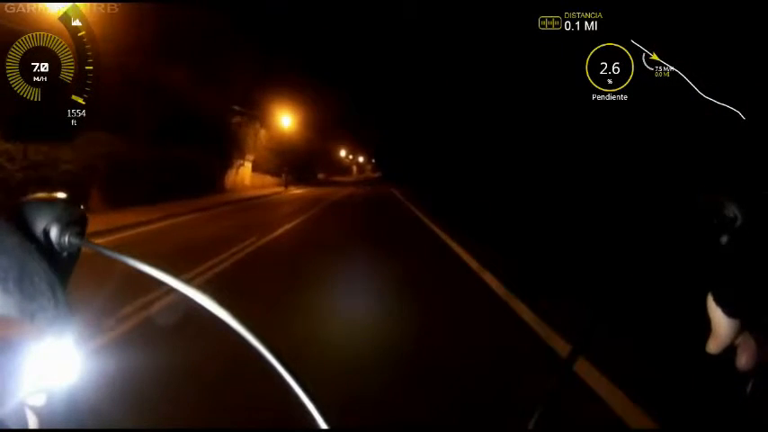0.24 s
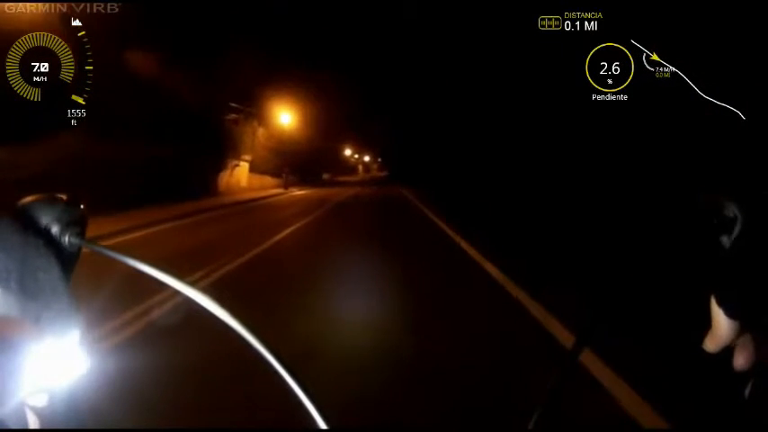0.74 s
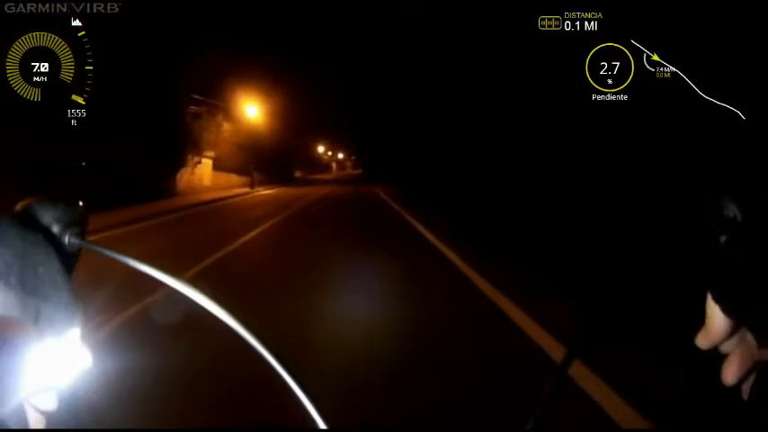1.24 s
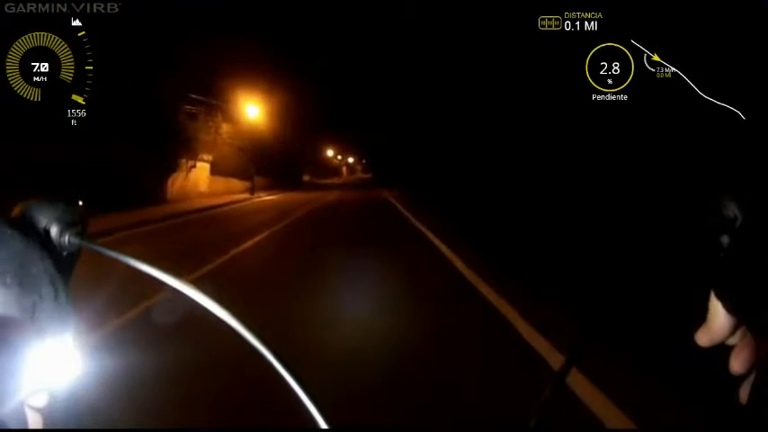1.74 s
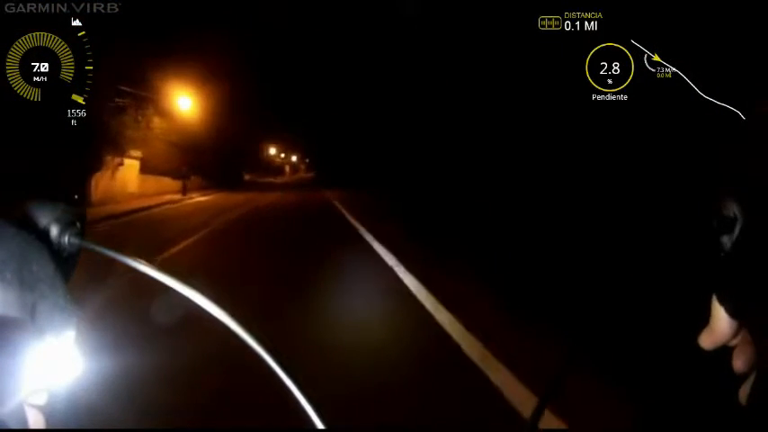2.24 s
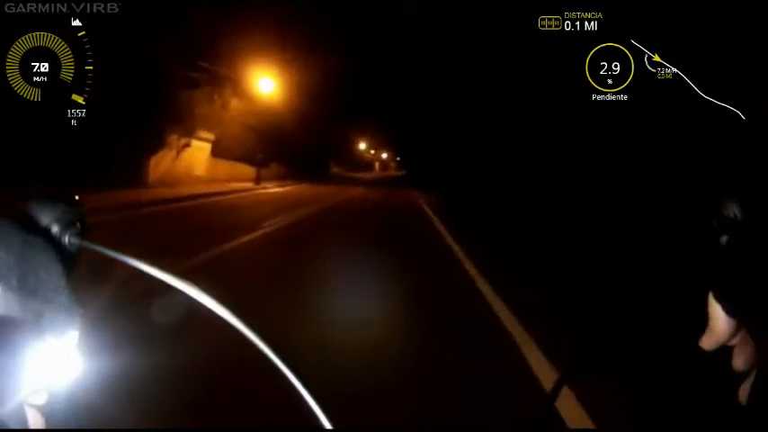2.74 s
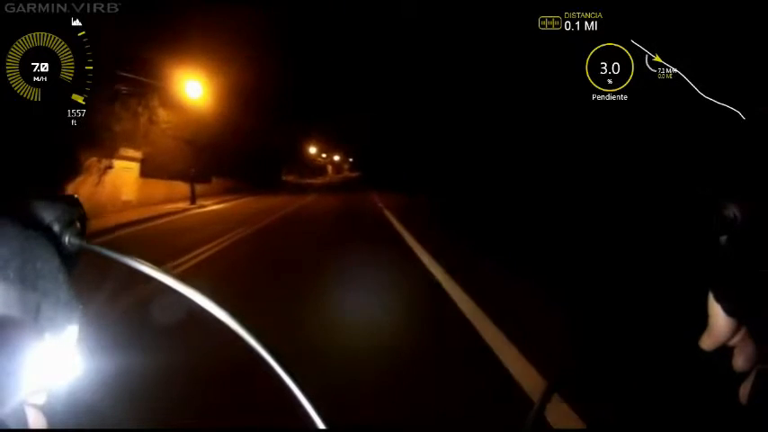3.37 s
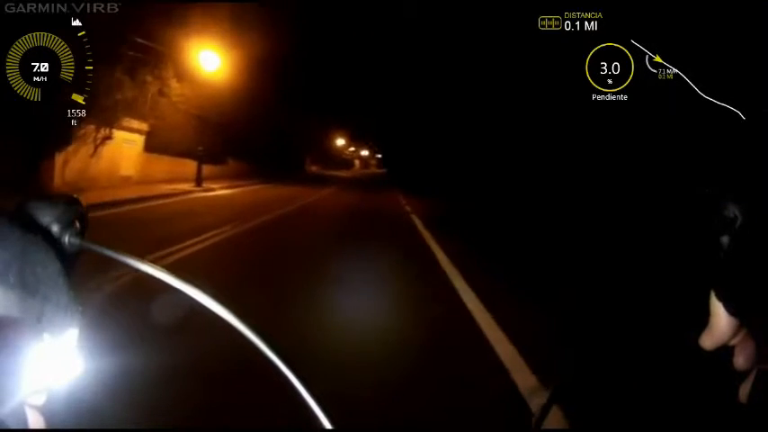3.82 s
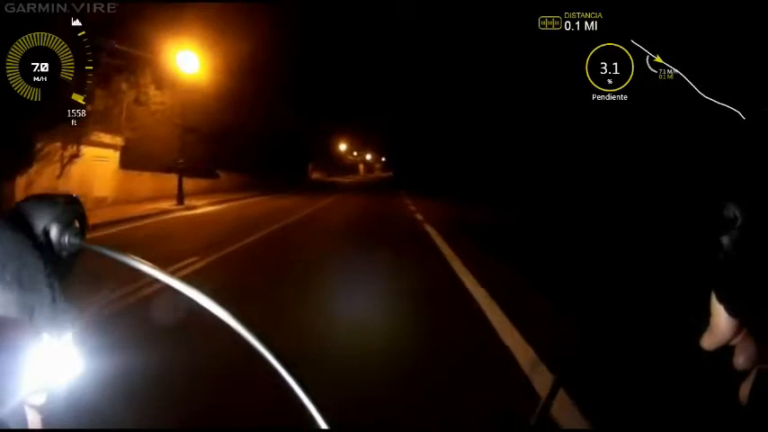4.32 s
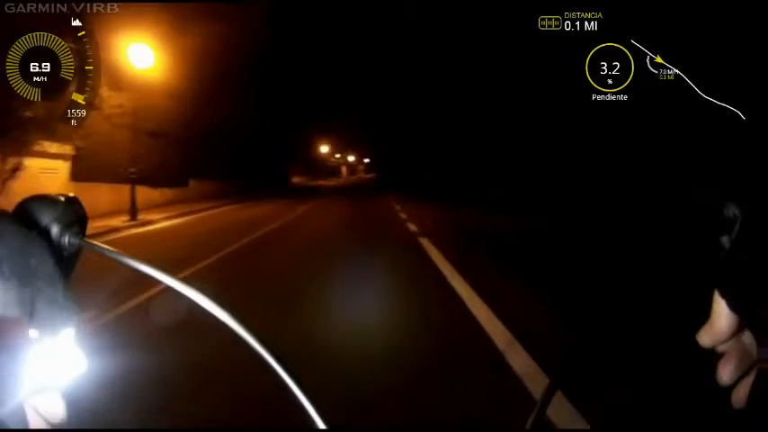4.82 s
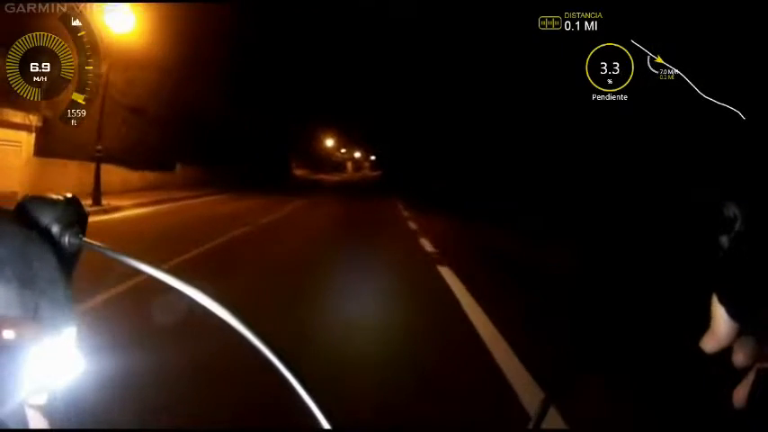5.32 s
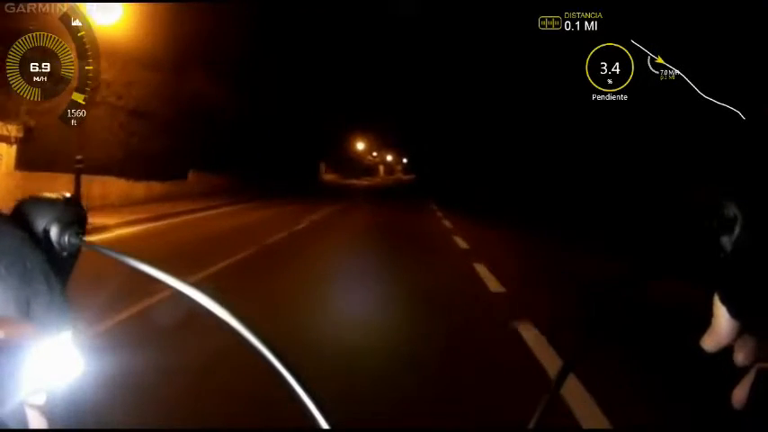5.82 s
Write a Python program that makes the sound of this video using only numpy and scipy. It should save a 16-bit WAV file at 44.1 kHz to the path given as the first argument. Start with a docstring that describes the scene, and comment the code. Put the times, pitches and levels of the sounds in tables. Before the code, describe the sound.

Close, enclosed handlebar sound of slow riding: the tyre's rough contact with asphalt becomes a constant boxy mid-low drumming, dull on top. Small thuds, tiny random taps and irregular knocks of a loose part punctuate it. Most knocks are weak and muffled; a handful are crisp short clicks or tight clusters. A low bar wobble swells slightly after two seconds, and very faint hiss lies underneath.

```python
"""A bicycle rolls slowly on asphalt, heard from inside a closed hollow case on the handlebar.
Road: random grain pushes and single stone thuds, filtered by tyre and case. Bar: low shaped noise, level varied.
Loose part: short runs of contacts, each a knock ringing the case plus a sharp noise tick.
Chain and cables: light random taps. Microphone: faint shaped hiss."""
import sys
import numpy as np
from scipy import signal
from scipy.fft import rfft, irfft
from scipy.io import wavfile

SR = 44100
rng = np.random.default_rng(int(sys.argv[2]) if len(sys.argv) > 2 else 0)


def bounce(signal):
    """Save signal as a 16-bit WAV file at the path given by the first command-line argument."""
    frames = np.transpose(np.atleast_2d(signal))
    limited = np.clip(frames, -1, 1)
    pcm = np.round(limited * 32767).astype(np.int16)
    wavfile.write(sys.argv[1], SR, pcm)


N = 268569
TIME_S, FREQ_HZ = np.arange(N) / SR, np.fft.rfftfreq(2 * N, 1 / SR)

# resonances of the case: f/Hz, width/Hz, relative level/dB
CASE_MODES = [(255.7, 40, -12), (289, 22, -9.5), (354, 25, -3.5), (404.5, 52, 1.5), (474, 85, -3),
              (520.4, 24.4, -2.5), (580.5, 24, 0.5), (654.5, 78.4, 1.5), (684, 39, 3.5), (809.6, 48.5, -3),
              (897, 46, -6), (1022, 108, -14), (1160, 70, -39), (1331, 52, -14), (1475, 80, -21.5),
              (1655, 91, -19), (1754, 81, -21.5), (1952, 74, -26.5), (2290, 160, -35), (2950, 260, -37.5),
              (3700, 910, -54.5)]
# force passed on from the asphalt by the soft tyre: f/Hz, relative level/dB
TYRE_FORCE = [(30, -11), (150, -4.5), (250, 0), (400, 6), (650, -2), (800, -10.5), (1000, -14.5),
              (1330, -10.5), (1600, -39.5), (2200, -26), (3200, -27), (6000, -41), (16000, -62)]
# coarse stones under the tyre: t/s, peak level before trim/dB
STONE_THUDS = [(0.582, -26.5), (0.697, -20), (1.36, -19), (1.859, -26), (1.944, -22), (2.214, -22),
               (3.624, -20.5)]
# spectrum of the bar's sway: f/Hz, relative level/dB
BAR_SWAY = [(5, -31), (20, -1), (36, -5.5), (45, -5.5), (54, 4.5), (66, -8), (95, -7), (170, -12.5),
            (300, -29.5), (900, -67)]
# microphone hiss spectrum: f/Hz, relative level/dB
HISS_SPECTRUM = [(100, -3), (1800, 9), (3000, 1.5), (4200, 0.5), (5300, -0.5), (9400, -3), (13400, -6.5),
                 (15600, -9.5)]
# runs of the loose part: t of strongest contact/s, contacts before, contacts after, gap/s,
# knock level before trim/dB, tick level before trim/dB
RATTLE_RUNS = [(0.1768, 2, 2, .0095, -53, -53.5), (0.673, 0, 0, .02, -75, -87),
               (0.942, 0, 0, .02, -68, -85), (1.083, 2, 1, .022, -54, -66),
               (1.324, 1, 1, .0195, -64.5, -87), (1.416, 1, 0, .027, -62, -87),
               (1.834, 0, 0, .02, -66, -86), (2.133, 0, 0, .02, -57.5, -76), (2.2654, 0, 0, .02, -68, -85),
               (2.47, 0, 0, .02, -64, -88), (2.557, 0, 1, .0196, -59, -82), (2.9, 0, 1, 0.016, -61, -87),
               (3.6632, 0, 2, .0174, -54.5, -64), (3.807, 0, 0, .02, -69, -77),
               (4.011, 0, 0, .02, -68, -80), (4.237, 2, 0, .021, -60.5, -82),
               (4.314, 2, 1, .018, -64.5, -87), (4.4, 0, 0, .02, -57, -78),
               (4.5728, 0, 1, 0.016, -56, -65.5), (4.819, 0, 0, .02, -69, -75), (4.9, 1, 1, .019, -59, -81),
               (5.058, 0, 0, .02, -59.5, -82), (5.117, 0, 2, 0.017, -64, -81), (5.208, 0, 0, .02, -72, -80),
               (5.66, 2, 1, .0203, -55.5, -66.5), (6.0545, 0, 0, .02, -62, -80)]
# contact force as it reaches the case: f/Hz, relative level/dB
CONTACT_FORCE = [(60, 5.5), (200, 10.5), (400, -2.5), (650, 0), (850, -2.5), (1100, -0.5), (1330, -3.5),
                 (1480, 0), (1650, 0), (2000, 4), (3000, 1)]
# colour of a hard contact: f/Hz, relative level/dB
TICK_COLOUR = [(300, -21), (2300, -17), (2900, 1.5), (3750, 4.5), (4100, -5.5), (4600, -12.5), (5800, -12),
               (7200, -23.5), (9800, -20.5), (12200, -16.5), (15500, -31)]

DRUM_DB, HISS_DB = -35.5, -72  # rms
# bar: steady quiver, uneven stretch, jolt around each run (slope in dB per dB of knock)
QUIVER_DB = -56.5
UNEVEN_FROM_S, UNEVEN_TO_S, UNEVEN_RISE_S, UNEVEN_FADE_S, UNEVEN_DB = 2.16, 2.52, 0.066, 0.18, -53
JOLT_DB, JOLT_KNOCK_DB, JOLT_SLOPE, JOLT_S = -51.5, -52.5, 1.5, 0.05
# within a run: level drop at RUN_S from the strongest contact
RUN_S, KNOCK_FADE_DB, TICK_FADE_DB = 0.021, 2, 7
# bands in which knock and tick levels are set
KNOCK_BAND_HZ, TICK_BAND_HZ = (1450, 2200), (2600, 4500)
EDGE_HZ = 15720


def gain_of(db):
    """Decibels to amplitude."""
    return 10 ** (np.asarray(db) / 20)


def evened(x):
    """Scale to rms one."""
    return x / np.sqrt(np.mean(x ** 2) + 1e-20)


def colour(points):
    """Gain over FREQ_HZ, interpolated in dB over log frequency."""
    hz, db = np.transpose(points)
    return gain_of(np.interp(np.log(FREQ_HZ + 1), np.log(hz), db))


def ringing(gain, size=4096):
    """Minimum-phase impulse response of a gain, peak gain one, by cepstrum folding."""
    cepstrum = irfft(np.log(np.maximum(gain / gain.max(), 1e-5)))
    cepstrum[1:N] *= 2
    cepstrum[N + 1:] = 0
    return irfft(np.exp(rfft(cepstrum)))[:size]


def noise(gain):
    """Steady Gaussian noise of rms one, shaped by a gain."""
    white = rng.standard_normal(2 * N)
    return evened(irfft(rfft(white) * gain)[:N])


def add(mix, start_s, sound):
    """Mix a sound in at a time."""
    part = mix[max(round(start_s * SR), 0):][:len(sound)]
    part += sound[:len(part)]


def at_level(hit, db, band_hz):
    """Scale a hit so its in-band energy equals 8 ms at this rms level."""
    bandpass = signal.butter(4, band_hz, "band", fs=SR, output="sos")
    inside = signal.sosfilt(bandpass, hit)
    return hit * gain_of(db) * np.sqrt(0.008 * SR / np.sum(inside ** 2))


def case_gain(wall_db=-22, wall_hz=750):
    """Case resonances, power-summed with the dull sound passing its walls."""
    power = (gain_of(wall_db) / (1 + (FREQ_HZ / wall_hz) ** 2)) ** 2
    for hz, width_hz, db in CASE_MODES:
        mode = gain_of(db) / (1 + np.sqrt(2) * ((FREQ_HZ - hz) / width_hz) ** 2)
        power = power + mode ** 2
    return np.sqrt(power)


def road(case, grains_per_s=7000, spread_db=1.23, stone_trim_db=-3):
    """Asphalt grains push the tyre at random and drum in the case; coarse stones thud singly."""
    push = ringing(case * colour(TYRE_FORCE))
    count = N + len(push) - 1  # lead-in, so the drumming starts at full level
    size_db = spread_db * np.minimum(rng.exponential(1, count), 4)
    sizes = rng.standard_normal(count) * gain_of(size_db)
    grains = sizes * (rng.random(count) < grains_per_s / SR)
    out = evened(signal.fftconvolve(grains, push, "valid")) * gain_of(DRUM_DB)
    thud = push / abs(push).max()
    for start_s, peak_db in STONE_THUDS:
        add(out, start_s, gain_of(peak_db + stone_trim_db) * thud)
    return out


def handlebar():
    """Bar and fork quiver at their low bending note, more on uneven asphalt and around each rattle run."""
    rise = np.clip((TIME_S - UNEVEN_FROM_S) / UNEVEN_RISE_S, 0, 1)
    uneven = rise * np.exp(-np.maximum(TIME_S - UNEVEN_TO_S, 0) / UNEVEN_FADE_S)
    jolts = np.zeros(N)
    for run_s, _, _, _, knock_db, _ in RATTLE_RUNS:
        jolt_db = JOLT_DB + JOLT_SLOPE * (knock_db - JOLT_KNOCK_DB)
        jolts += gain_of(jolt_db) * np.exp(-((TIME_S - run_s) / JOLT_S) ** 2)
    level = np.sqrt(gain_of(QUIVER_DB) ** 2 + (gain_of(UNEVEN_DB) * uneven) ** 2 + jolts ** 2)
    return noise(colour(BAR_SWAY)) * level


def hiss(echo=0.24, echo_s=0.000475):
    """Microphone noise, slightly hollow from a very short inverted echo."""
    comb = abs(1 - echo * np.exp(-2j * np.pi * FREQ_HZ * echo_s))
    return gain_of(HISS_DB) * noise(colour(HISS_SPECTRUM) * comb)


def scatter(spread_s, size=768):
    """Impulse smeared over a few ms by the frame: random phase, nearly flat spectrum."""
    swell = np.sin(np.pi * np.minimum(TIME_S[:size] / spread_s, 1))
    spectrum = rfft(rng.standard_normal(size) * swell)
    return irfft(spectrum / abs(spectrum)) * (swell > 1e-9)


def contacts():
    """All loose-part contacts (t/s, knock/dB, tick/dB), weaker away from each run's strongest."""
    rows = []
    for run_s, before, after, gap_s, knock_db, tick_db in RATTLE_RUNS:
        for offset_s in gap_s * np.arange(-round(before), round(after) + 1):
            away = (offset_s / RUN_S) ** 2
            rows.append((run_s + offset_s, knock_db - KNOCK_FADE_DB * away, tick_db - TICK_FADE_DB * away))
    return rows


def faint_ticks(case, ticks_per_s=150, spread_db=2.0, ticks_db=-69, busy_db=5, busy_s=0.032, spread_s=0.005):
    """Chain and cables tap lightly at random, harder near loose-part contacts."""
    nearness = sum(np.exp(-((TIME_S - contact_s) / busy_s) ** 2) for contact_s, _, _ in contacts())
    size_db = spread_db * np.minimum(rng.exponential(1, N), 3) + busy_db * np.tanh(nearness / 2)
    taps = np.zeros(N)
    for i in np.flatnonzero(rng.random(N) < ticks_per_s / SR):
        add(taps, i / SR, gain_of(size_db[i]) * scatter(spread_s))
    tap = ringing(case * colour([(400, -19.5), (1300, -5.0), (1700, -8), (3000, 7.0)]))
    return gain_of(ticks_db) * evened(signal.fftconvolve(taps, tap)[:N])


def rattle(case, spread_s=0.0058, knock_trim_db=1, tick_trim_db=1, heavy_db=-48, sharp_db=-54,
           shortest_s=0.0012, doubling_db=13, bright_hz=13000, dulling=1.7, tick_delay_s=0.00138):
    """Each contact rings the case and ticks: heavier knocks tick brighter, weaker ticks last longer."""
    knock, tick = ringing(case * colour(CONTACT_FORCE)), ringing(colour(TICK_COLOUR))
    t, out = TIME_S[:512], np.zeros(N)
    for start_s, knock_db, tick_db in contacts():
        decay_s = shortest_s * 2 ** (max(sharp_db - tick_db, 0) / doubling_db)
        scrape = rng.standard_normal(len(t)) * np.exp(-t / decay_s)
        lowpass_hz = bright_hz * gain_of(dulling * min(knock_db - heavy_db, 0))
        pole = np.exp(-2 * np.pi * lowpass_hz / SR)
        snap = signal.fftconvolve(signal.lfilter([1], [1, -pole], scrape), tick)
        ring = signal.fftconvolve(scatter(spread_s), knock)
        add(out, start_s, at_level(ring, knock_db + knock_trim_db, KNOCK_BAND_HZ))
        add(out, start_s + tick_delay_s, at_level(snap, tick_db + tick_trim_db, TICK_BAND_HZ))
    return out


def scene():
    """Sum of all sources at the one microphone in the case."""
    case = case_gain()
    return (road(case) + handlebar() + hiss() + faint_ticks(case) + rattle(case))[None]


def record(dry):
    """Recorder band limit: linear-phase lowpass at EDGE_HZ."""
    lowpass = signal.firwin(1023, EDGE_HZ, window=("kaiser", 9), fs=SR)
    return signal.oaconvolve(dry, lowpass[None], "same")


dry = scene()
out = record(dry)
bounce(out)
```